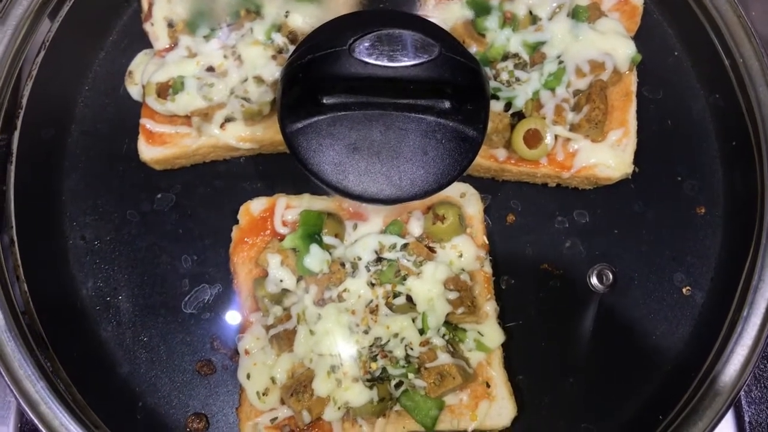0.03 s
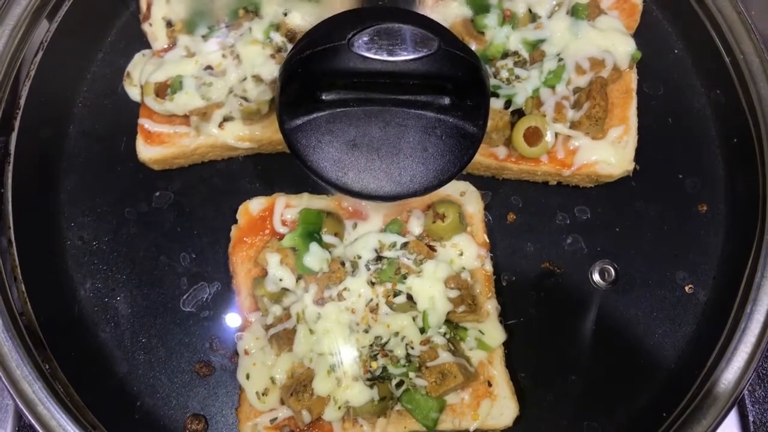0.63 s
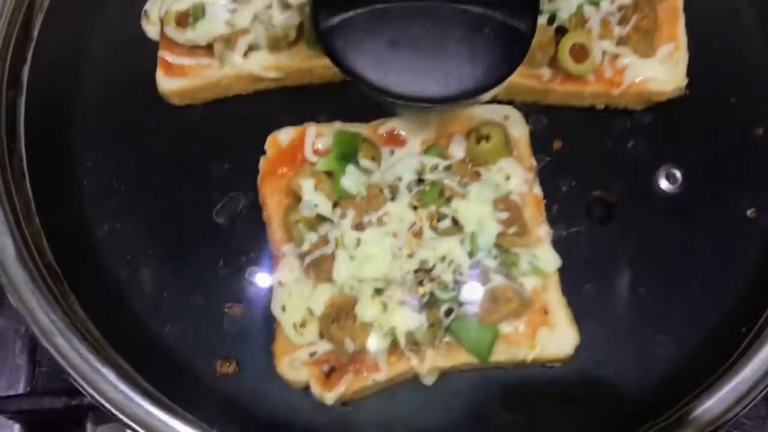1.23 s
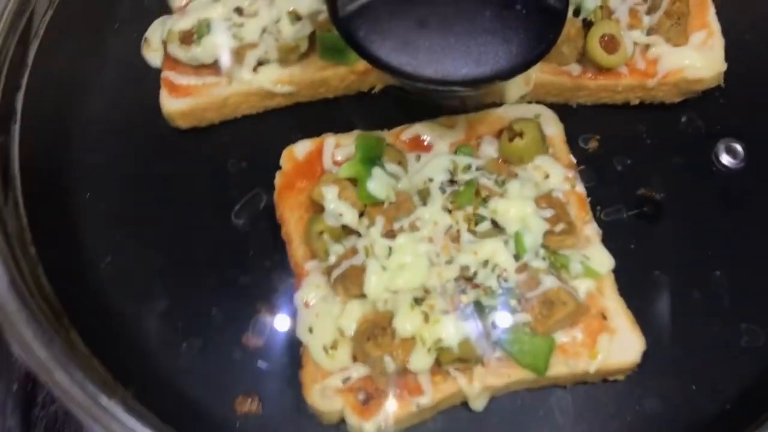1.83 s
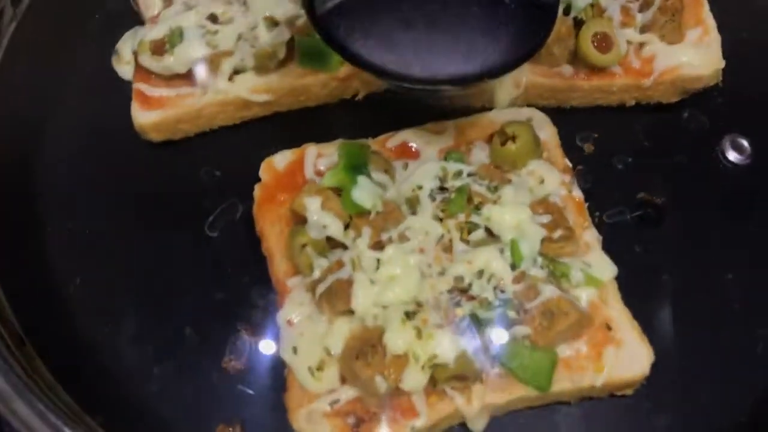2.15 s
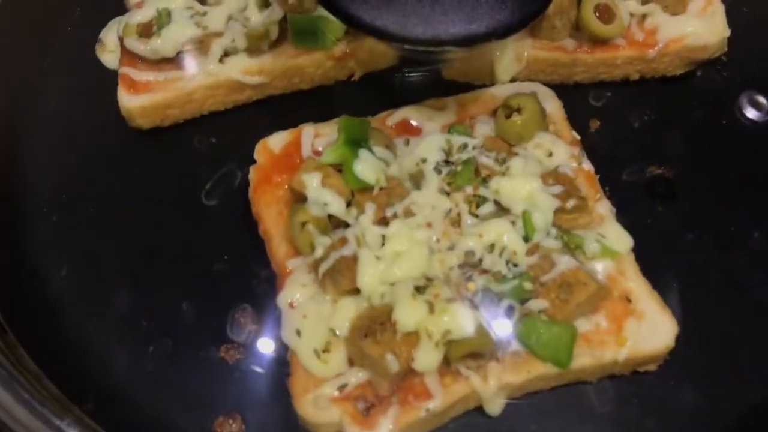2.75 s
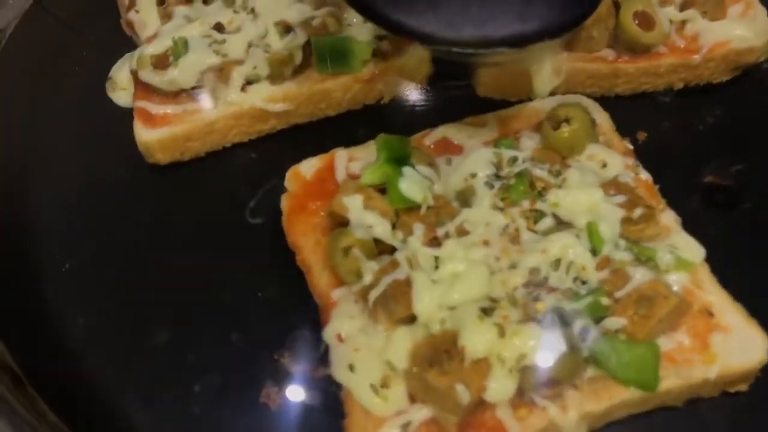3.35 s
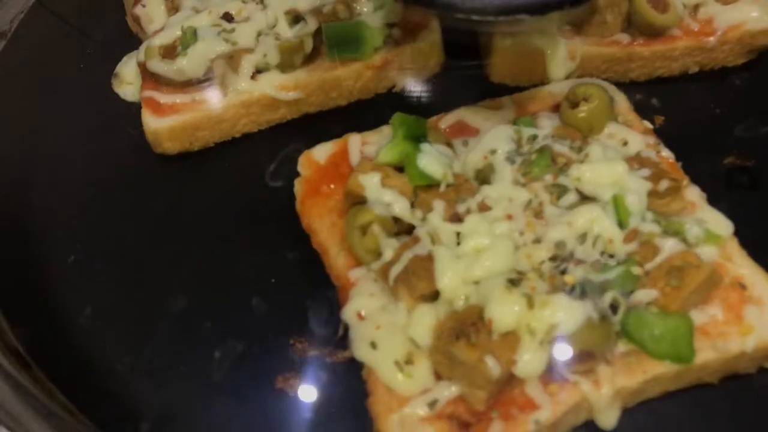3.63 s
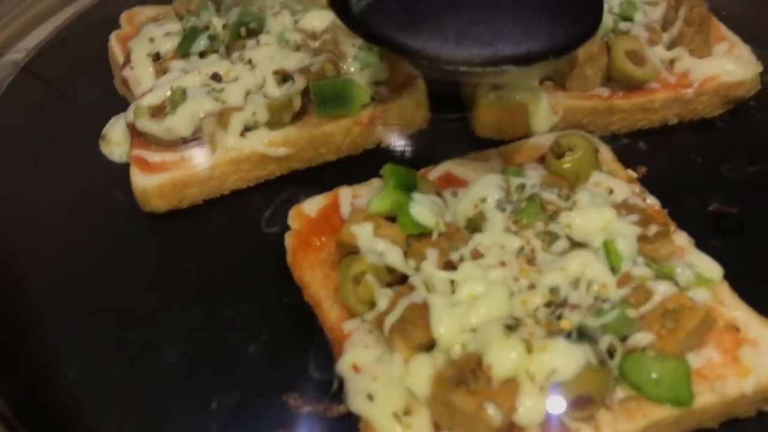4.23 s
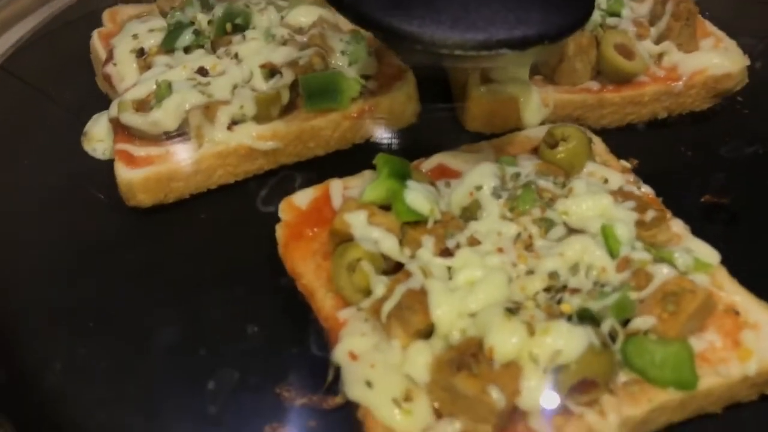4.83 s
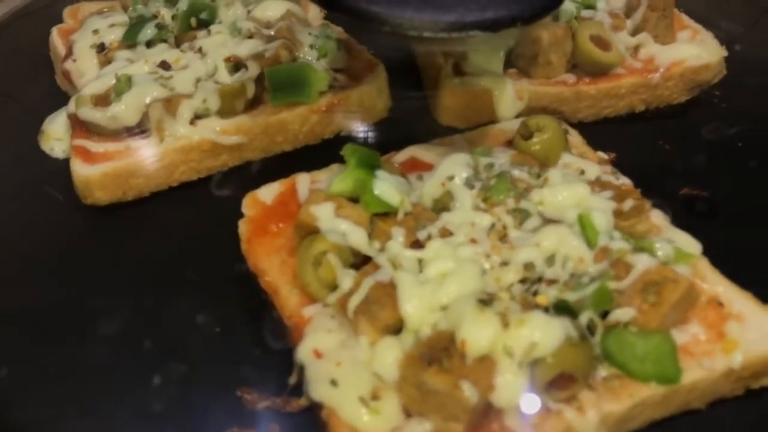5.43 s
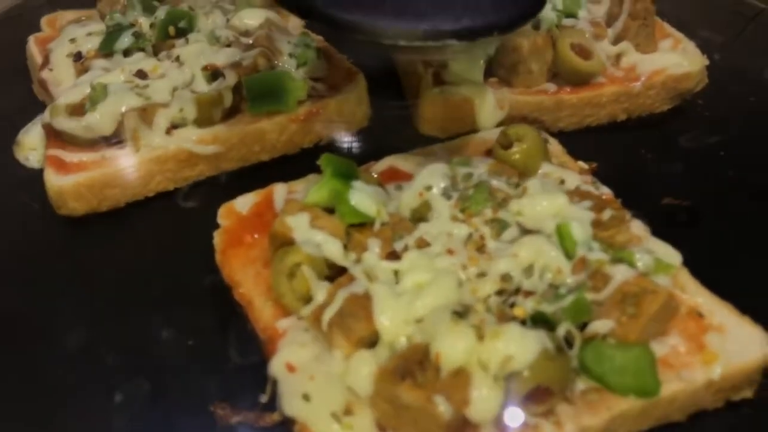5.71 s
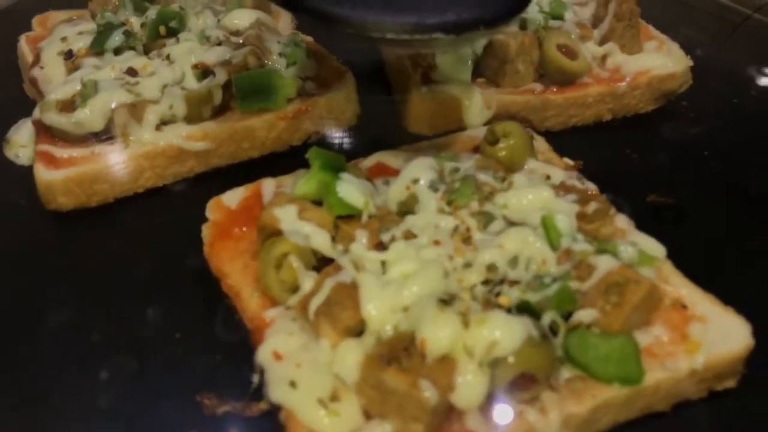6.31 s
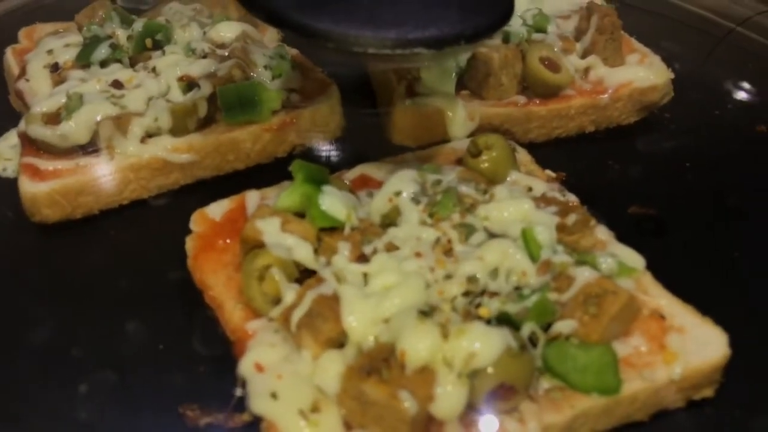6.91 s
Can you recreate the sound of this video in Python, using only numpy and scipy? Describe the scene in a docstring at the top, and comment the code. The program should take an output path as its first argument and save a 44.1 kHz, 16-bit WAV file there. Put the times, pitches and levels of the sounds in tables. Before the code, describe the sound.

Faint sizzling and small pops of fat come from a pan over a low burner murmur, heard up close in a small kitchen. A ringing knock on the pan comes first, then a short drag and a loud clink of its glass lid, which shivers and settles on its metal rim. Light brushes and a tink of a steel utensil follow, with soft low bumps from the hand-held microphone.

```python
"""A small kitchen, where bread toasts in a covered pan. The burner murmurs, and bursting bubbles of fat
sizzle and crackle faintly. Soft bumps ring the low modes of the hand-held microphone as it leans in,
and a steel utensil brushes and tinks. Impact and friction excite the modes of the cookware: the pan is
knocked, then the steel-rimmed glass lid scuffs, drags, clinks loudly, bounces, shivers and rocks to rest."""
import sys
import numpy as np
from scipy import signal
from scipy.fft import rfft, irfft, next_fast_len
from scipy.io import wavfile

SR = 44100
rng = np.random.default_rng(int(sys.argv[2]) if len(sys.argv) > 2 else 0)


def log_audio(samples):
    """Write samples as a 16-bit WAV file to the path given in sys.argv[1]."""
    # one column per channel
    frames = np.atleast_2d(samples).T
    # limit to full scale, then quantise
    limited = np.clip(frames, -1, 1)
    pcm = np.round(limited * 32767).astype(np.int16)
    wavfile.write(sys.argv[1], SR, pcm)


N = 307021

# Contacts of pan and lid. Each row: start in seconds, level in dB, brightness in Hz, contact in seconds.
PAN_BLOWS = [(1.181, -22, 15000, 0.048), (1.1875, -22.5, 6000, 0.014), (1.243, -37, 16000, 0.034),
             (1.289, -53, 9000, 0.016)]
RIM_SCUFFS = [(1.455, -42, 8800, 0.012), (1.466, -47, 5060, 0.073), (2.351, -38.5, 12020, 0.04),
              (2.357, -35, 4920, 0.0084), (2.374, -39.5, 3980, 0.027), (2.403, -43, 1786, 0.027)]
CLINK_AND_BOUNCE = [(2.5378, -13.5, 15600, 0.025), (2.6025, -25.5, 3700, 0.032)]
RIM_ROCKS = [(2.845, -43, 12000, 0.15), (2.905, -45, 12000, 0.15), (2.957, -35, 12000, 0.038),
             (2.992, -30, 3870, 0.012), (3.028, -36.5, 5860, 0.018), (3.063, -54, 2000, 0.0089),
             (3.176, -43.5, 6040, 0.022)]
# Utensil strokes. Each row: time of the peak in seconds, level in dB, swell in seconds, T60 in seconds.
UTENSIL_BRUSHES = [(2.275, -56.5, 0.031, 0.27), (2.358, -46, 0.0077, 0.069), (3.995, -42, 0.0086, 0.18),
                   (4.014, -37, 0.0072, 0.047), (4.235, -49, 0.0038, 0.049), (4.314, -55.5, .006, 0.18)]
UTENSIL_TINKS = [(.492, -52, .003, 0.058), (1.085, -55.5, .004, .1), (1.137, -48.5, .003, 0.091),
                 (4.373, -34.5, 0.0058, 0.11)]
# Impulses. Each row: start in seconds, relative strength in dB.
FIRM_BUMPS = [(0.083, -38.5), (1.556, -41), (1.698, -38), (1.782, -34), (1.8, -36), (2.173, -33),
              (2.732, -36.5), (3.143, -35), (3.468, -34), (3.618, -32), (3.79, -32), (3.857, -32.5),
              (3.94, -38), (4.05, -37), (4.141, -33.5), (4.412, -34), (4.566, -36), (4.66, -33),
              (4.764, -33.5), (4.851, -34), (4.94, -33), (5.035, -33.5), (5.145, -33.5), (5.348, -33),
              (5.561, -33), (6.091, -33), (6.192, -32.5), (6.291, -36), (6.444, -32), (6.656, -31),
              (6.888, -34.5)]
FAT_POPS = [(0.3346, -45.5), (0.7282, -35), (1.6237, -45), (1.6482, -40), (1.8362, -43), (1.8711, -41),
            (2.3825, -45), (3.685, -44), (4.4413, -33), (5.218, -38), (5.5887, -41)]
# Normal modes. Each row: frequency in Hz, relative level in dB, nominal T60 in seconds.
HANDSET_MODES = [(97, -2.5, 0.093), (138, -38, 0.07), (244.5, -23, 0.0055), (279.2, 1.5, 0.057),
                 (362, -18, 0.13), (471, -13.5, 0.06), (615, -13.5, 0.093), (700, -12.5, 0.039),
                 (1010, -18, 0.013)]
PAN_MODES = [(231, -6, 0.6), (926, -5, 0.48), (1093, 0, 0.49), (1115, 0, 0.47), (1340, -8, 0.47),
             (1467, -3, 0.36), (1507, -4, 0.29), (1884, -11, 0.52), (1930, -10, 0.6), (2347, -4, 0.44),
             (2536, -2, 0.46), (2586, -1, 0.41), (3033, -6, 0.45), (3110, -8, 0.55), (3908, -6, 0.6),
             (4167, -6, 0.37), (4667, -20, 0.46), (4877, -10, 0.32), (5285, -12, 0.53), (5475, -13, 0.4),
             (5884, -18, 0.5), (6158, -16, 0.32), (6940, -17, 0.37), (8155, -17, 0.34), (8549, -16, 0.46),
             (8960, -25, 0.42), (9385, -19, 0.31), (10820, -23, 0.36), (12180, -21, 0.27),
             (12410, -19, 0.42)]
FREE_LID_MODES = [(641, -17, 0.58), (942, -11, 0.33), (1010, -9, 0.44), (1043, -11, 0.47),
                  (1104, -13, 0.54), (1165, -10, 0.46), (1378, -13, 0.35), (1600, -13, 0.35),
                  (1730, -15, 0.33), (1884, -17, 0.38), (2165, -10, 0.42), (2272, -18, 0.49),
                  (2375, -15, 0.33), (2620, -14, 0.29), (2853, -18, 0.46), (3080, -17, 0.41),
                  (3560, -10, 0.4), (3765, -17, 0.59), (3978, 0, 0.45), (4011, -2, 0.36), (5100, -24, 0.42),
                  (5335, -16, 0.55), (6100, -12, 0.48), (6950, -13, 0.46), (9055, -20, 0.4),
                  (9469, -31, 0.4), (12015, -27, 0.44), (12200, -30, 0.44)]
SEATED_LID_MODES = [(630, -5.5, 0.22), (1130, -1, 0.15), (1241, -1, 0.2), (2620, -7.5, 0.29),
                    (3580, -15, 0.16), (4150, -17, 0.18), (5240, -23, 0.4), (6130, -34, .4),
                    (6960, -28, .3), (9055, -23, .4)]
# Resonances driven by noise. Each row: frequency in Hz, bandwidth in Hz, relative gain in dB.
BURNER_PEAKS = [(604, 23, -0.64), (620, 100, -1.3)]
CAVITY_PEAKS = [(922.3, 13, 1), (1153, 14.6, 0), (1126, 132, -6), (1478, 53, -10.5)]
SIZZLING_PAN_PEAKS = [(2556, 130, -7.5), (3060, 25, -0.5), (4085, 50, -2.5), (5396, 190, -5), (6017, 50, 1),
                      (6600, 68, -6), (8070, 110, -15)]
BRUSHED_STEEL_PEAKS = [(2207, 18, 3.5), (3733, 35, -3), (4260, 13, -4), (5500, 220, -12.5), (5590, 29, -8),
                       (7360, 14, -6.5), (8640, 78, -13), (9740, 18, -7), (11000, 50, -30.5),
                       (12560, 130, -17.5), (4556, 3000, -22.5)]
TAPPED_STEEL_PEAKS = [(3670, 50, -13.5), (4170, 23, 3.5), (5240, 35, -9), (6670, 13, -9), (6900, 74, -11),
                      (7450, 110, -30), (9300, 57, -19), (12700, 47, -8), (4260, 2800, -23.5)]
# Spectra of steady noise and of dense, brief modes. Each row: frequency in Hz, relative density in dB.
MURMUR_SPECTRUM = [(15, -28), (25, -13), (54, -1), (139, -1.5), (196, -4.5), (216, -7.5), (248, -1),
                   (344, -9.5), (371, -8), (525, -16.5), (612, -7.5), (701, -15.5), (1160, -20),
                   (1270, -26), (2500, -31.5), (3250, -40), (5500, -120)]
SIZZLE_SPECTRUM = [(500, -27), (1500, -1), (2700, 6), (4200, 3), (5000, -0.5), (6000, -3), (6800, -2.5),
                   (7600, -14), (8400, 2), (10000, -7.5), (11400, 2.5), (12600, -3.5), (16000, -3)]
KNOCK_SPECTRUM = [(100, -9), (165, -20), (225, -2.5), (380, -15), (520, -13), (950, -4.5), (1500, -4),
                  (2100, -12.5), (2600, -1.5), (3450, -14.5), (4050, -6), (4700, -17), (8500, -17),
                  (16000, -26.5)]
SCUFF_SPECTRUM = [(120, -46), (200, -23), (292, 13), (447, -25), (550, 3), (1210, -8.5), (1560, -5.5),
                  (2950, -26), (3680, -21), (4680, -26), (12000, -35), (15600, -68), (22000, -120)]
CLINK_SPECTRUM = [(70, -19), (120, -2), (185, -11), (370, -6), (500, -13), (650, -7), (790, -2),
                  (1050, 0.5), (2200, -6), (3300, -7.5), (4200, -3), (4700, -24), (6600, -12.5),
                  (7800, -31.5), (9300, -18), (10500, -49), (12200, -37), (16000, -37)]
ROCK_SPECTRUM = [(180, -55), (300, -16), (535, -16), (562, -12), (639, 0.5), (925, -14), (1200, 6.5),
                 (1450, -9), (2590, -14), (2800, -35), (3630, -18), (4620, -27), (14000, -56)]
# Vigour of the frying, which acts relative to its mean. Each row: time in seconds, level in dB.
FRYING_VIGOUR = [(0.0, -76.5), (1.03, -67.5), (1.43, -68.5), (1.72, -66), (2.48, -71), (2.73, -66),
                 (3.18, -71.5), (3.95, -62), (5.08, -67.5), (5.45, -64), (6.43, -66.5), (6.96, -58)]

KITCHEN_T60_S, CUTOFF_HZ = 0.54, 15800
ROLL_ON_S = 0.003   # build-up of a rolling or sliding contact
TIME = np.arange(N) / SR


def from_db(db):
    """Amplitude grows tenfold for every 20 dB."""
    return 10 ** (np.asarray(db) / 20)


def unit_rms(x):
    """Division by the rms gives a signal unit power."""
    return x / np.sqrt(np.mean(x ** 2) + 1e-20)


def decay(t, t60):
    """Damping lowers a vibration exponentially, by 60 dB in t60 seconds."""
    return np.exp(-np.log(1000) * t / t60)


def ramp(start_s, length_s):
    """A linear transition rises from 0 to 1 and holds."""
    return np.clip((TIME - start_s) / length_s, 0, 1)


def butter(x, hz, kind, order=2):
    """A Butterworth filter falls 6 dB an octave per order beyond its corner."""
    return signal.sosfilt(signal.butter(order, hz, kind, fs=SR, output="sos"), x + 1e-18)


def add(out, start_s, sound):
    """By superposition, a sound adds to those already present."""
    start = round(start_s * SR)
    out[start:start + len(sound)] += sound[:len(out) - start]


def impulses(rows):
    """A very brief force acts as a single impulse."""
    out = np.zeros(N)
    for start_s, db in rows:
        add(out, start_s, from_db([db]))
    return out


def coloured(spectrum, size):
    """Filtered white noise takes on the spectrum of the filter; the rms is 1."""
    hz, db = np.transpose(spectrum)
    padded = next_fast_len(size)
    f = np.fft.rfftfreq(padded, 1 / SR) + 1e-3
    skirts = 1 / ((1 + (hz[0] / f) ** 4) * (1 + (f / hz[-1] / 2) ** 4))
    gain = from_db(np.interp(np.log(f), np.log(hz), db)) * skirts
    return unit_rms(irfft(rfft(rng.standard_normal(padded)) * gain, padded)[:size])


def rippled(spectrum, depth_db=5, spacing_hz=55):
    """Many weak resonances lay narrow peaks and valleys over a smooth spectrum."""
    hz, db = np.transpose(spectrum)
    grid = np.arange(spacing_hz, CUTOFF_HZ, spacing_hz)
    ripple = depth_db * np.clip(rng.standard_normal(len(grid)), -2, 2) * grid / (grid + 1000)
    return np.column_stack([grid, np.interp(np.log(grid), np.log(hz), db) + ripple])


def resonant(peaks, size):
    """Randomly forced resonators respond most near their natural frequencies; the rms is 1."""
    out = 0
    for hz, width, db in peaks:
        radius = np.exp(-np.pi * width / SR)
        poles = [1, -2 * radius * np.cos(2 * np.pi * hz / SR), radius ** 2]
        out += from_db(db) * signal.lfilter([1 - radius, 0, radius - 1], poles, rng.standard_normal(size))
    return unit_rms(out)


def interference(size, rate_hz):
    """Reflections adding in and out of step give a wandering complex amplitude."""
    knots, samples = np.arange(0, size, SR / rate_hz), np.arange(size)
    real, imag = rng.standard_normal((2, 400))[:, :len(knots)]
    return np.interp(samples, knots, real + 1j * imag) / np.sqrt(2)


def blows(rows, modes, spectrum, *, ring_db, tilt_db, sustain_db, t60_scale, clatter_db, room_db,
          dull_hz, attack_s):
    """Struck bodies vibrate freely until contact damps them; a weaker ring and reverberation remain."""
    out, t = np.zeros(N), np.arange(SR) / SR
    modal_rms = np.sqrt(np.sum(from_db(np.array(modes)[:, 1]) ** 2) / 2)
    body = rippled(spectrum)
    for start_s, db, bright_hz, contact_s in rows:
        free = np.exp(-(t / contact_s) ** 4) * decay(t, 0.24)
        ring = 0
        for hz, mode_db, t60 in modes:
            sustain = from_db(sustain_db) * decay(t, t60 * t60_scale)
            envelope = free + sustain * (0.5 + interference(SR, rate_hz=61.3))
            strength = from_db(mode_db + tilt_db * np.log2(1 + hz / 3000))   # hard contacts tilt upward
            ring += strength * np.real(envelope * np.exp(2j * np.pi * (hz * t + rng.random())))
        # Dense, brief modes merge into a clatter, whose treble dies first in the room.
        echo = coloured(body, SR)
        low = butter(echo, dull_hz, "low", order=1)
        tail = low * decay(t, KITCHEN_T60_S) + (echo - low) * decay(t, KITCHEN_T60_S * 0.63)
        clatter = coloured(body, SR) * free + from_db(room_db) * tail
        sound = from_db(ring_db) * ring / modal_rms + from_db(clatter_db) * clatter
        onset = 1 - np.exp(-t / attack_s)
        add(out, start_s, from_db(db) * butter(sound * onset, bright_hz, "low"))
    return out


def stove():
    """The burner murmurs; near the pan, cavity resonance under the lid takes over from its tone."""
    nearness = ramp(1.3, 2.43) - 0.33 * ramp(5.0, 0.86)   # the microphone leans in, then partly back
    murmur = from_db(-53.5 + nearness) * coloured(MURMUR_SPECTRUM, N)
    cavity = from_db(-66.5 + 10 * nearness) * resonant(CAVITY_PEAKS, N)
    tone = from_db(-60.5 - 7.5 * nearness) * resonant(BURNER_PEAKS, N)
    return murmur + cavity + tone


def sizzle(vigour_db):
    """The hiss of hot fat forces the pan's resonances, whose ring swells once, slowly."""
    hiss = from_db(-62.5 + 0.31 * vigour_db) * coloured(rippled(SIZZLE_SPECTRUM, depth_db=3), N)
    swell_db = 5 * np.exp(-((TIME - 2.92) / 1.6) ** 2)
    return hiss + from_db(-67.5 + swell_db) * resonant(SIZZLING_PAN_PEAKS, N)


def bursting_fat(vigour_db, crackles_per_s=500, spread_db=5.5, drying_db_per_s=1.46, spits_per_s=11):
    """Bursting bubbles make shot noise: a fine crackle, sharp pops and lower spits from larger bubbles."""
    sizes = from_db(spread_db * np.minimum(rng.exponential(1, N), 4)) * rng.choice([-1, 1], N)
    tiny_bursts = sizes * (rng.random(N) < crackles_per_s / SR)
    t = np.arange(SR // 10) / SR
    snap = rng.standard_normal(len(t)) * (decay(t, 0.0058) + from_db(-12) * decay(t, 0.13))
    crackle = butter(signal.fftconvolve(tiny_bursts, snap)[:N], 9300, "high")
    crackle_db = -60.5 + 1.2 * vigour_db - drying_db_per_s * TIME   # drying bread crackles less
    pops = butter(signal.fftconvolve(impulses(FAT_POPS), snap)[:N], 6700, "high", order=1)
    large_bursts = rng.uniform(-1, 1, N) * (rng.random(N) < spits_per_s / SR)
    spits = signal.fftconvolve(large_bursts, snap)[:N]
    spits = butter(butter(spits, 2600, "high"), 4800, "low")
    return from_db(crackle_db) * unit_rms(crackle) + from_db(-71) * unit_rms(spits) + from_db(-1) * pops


def fidgets(per_s=5, settle_s=3.5):
    """Faint bumps arrive as a Poisson process whose rate falls as the hand settles."""
    happens = rng.random(N) < per_s * np.exp(-TIME / settle_s) / SR
    levels_db = rng.normal(-43, 4.5, N)
    return impulses(zip(TIME[happens], levels_db[happens]))


def handling_bumps():
    """Structure-borne impulses ring the low modes of the handset, with a trace of a tick."""
    pushes = impulses(FIRM_BUMPS) + fidgets()
    grip = from_db(3.5 - 20 * ramp(5.3, 0.4))   # eases once and stays loose
    thud = 0
    for k, (hz, db, t60) in enumerate(HANDSET_MODES):
        radius, angle = decay(1 / SR, t60), 2 * np.pi * hz / SR
        poles = [1, -2 * radius * np.cos(angle), radius ** 2]
        drive = pushes * grip if k < 2 else -pushes   # the grip feeds two modes; the rest oppose them
        thud += from_db(db) * signal.lfilter([0, np.sin(angle)], poles, drive + 1e-18)
    tick = butter(pushes, 1400, "low", order=4)
    return from_db(-3) * butter(thud, 64, "high") + from_db(7.5) * tick


def utensil(rows, peaks, lead_s=0.25):
    """Friction swells and briefly drives the resonances of thin steel."""
    out, t = np.zeros(N), np.arange(SR) / SR - lead_s
    for peak_s, db, swell_s, t60 in rows:
        stroke = np.exp(np.minimum(t, 0) / swell_s) * decay(np.maximum(t, 0), t60)
        add(out, peak_s - lead_s, from_db(db) * stroke * resonant(peaks, SR))
    return out


def pan_knock():
    """An abrupt impact excites all the modes of the pan at once."""
    return blows(PAN_BLOWS, PAN_MODES, KNOCK_SPECTRUM, ring_db=-2, tilt_db=2, sustain_db=-12.5,
                 t60_scale=1, clatter_db=1, room_db=-10.5, dull_hz=3500, attack_s=0.00043)


def rim_scuffs():
    """Sliding contact of the rim on the pan yields more broadband clatter than ring."""
    return blows(RIM_SCUFFS, PAN_MODES, SCUFF_SPECTRUM, ring_db=-8, tilt_db=2.3, sustain_db=-10,
                 t60_scale=0.69, clatter_db=4.5, room_db=-11, dull_hz=2500, attack_s=ROLL_ON_S)


def rim_drag(release_s=2.355, swell_s=0.16):
    """Friction noise grows as the rim presses harder on the pan, until it breaks into a scuff."""
    t = TIME - release_s
    envelope = np.exp(np.minimum(t, 0) / swell_s) * decay(np.maximum(t, 0), KITCHEN_T60_S)
    rub = from_db(-48) * coloured(rippled(SCUFF_SPECTRUM), N)
    rumble = from_db(-47.5) * unit_rms(butter(coloured(MURMUR_SPECTRUM, N), 160, "low"))
    return envelope * (rub + rumble)


def lid_clink():
    """A hard impact favours the lid's high modes; the bounce is weaker and duller."""
    return blows(CLINK_AND_BOUNCE, FREE_LID_MODES, CLINK_SPECTRUM, ring_db=-1.5, tilt_db=3.5,
                 sustain_db=-9, t60_scale=0.99, clatter_db=0.5, room_db=-9.5, dull_hz=1992,
                 attack_s=0.00017)


def lid_shiver(start_s=2.712, gap_s=0.04, loss_db=2, bright_hz=16000, contact_s=0.051):
    """The lid chatters on the pan in light, evenly spaced touches, losing energy at each."""
    touches = [(start_s + k * gap_s, -46.5 - k * loss_db, bright_hz, contact_s) for k in range(5)]
    return blows(touches, FREE_LID_MODES, CLINK_SPECTRUM, ring_db=-2, tilt_db=4.5, sustain_db=-9,
                 t60_scale=1, clatter_db=3.5, room_db=-8, dull_hz=2200, attack_s=ROLL_ON_S)


def lid_rocking():
    """Rolling contact on the rim excites the more heavily damped modes of the seated lid."""
    return blows(RIM_ROCKS, SEATED_LID_MODES, ROCK_SPECTRUM, ring_db=-1.5, tilt_db=-0.5, sustain_db=-3.5,
                 t60_scale=0.79, clatter_db=3, room_db=-13, dull_hz=3000, attack_s=ROLL_ON_S)


def scene():
    """The pressures of all sources superpose at one close microphone."""
    steel = utensil(UTENSIL_BRUSHES, BRUSHED_STEEL_PEAKS) + utensil(UTENSIL_TINKS, TAPPED_STEEL_PEAKS)
    vigour_db = np.interp(TIME, *np.transpose(FRYING_VIGOUR))
    vigour_db -= vigour_db.mean()
    frying = sizzle(vigour_db) + bursting_fat(vigour_db)
    cookware = pan_knock() + lid_clink() + lid_shiver() + lid_rocking() + rim_scuffs() + rim_drag()
    return (cookware + steel + handling_bumps() + frying + stove())[None]


def record(dry):
    """Soft saturation rounds the peaks, and a steep low-pass limits the bandwidth."""
    low_pass = signal.ellip(10, 0.1, 80, CUTOFF_HZ, fs=SR, output="sos")
    return signal.sosfilt(low_pass, 1.2 * np.tanh(dry / 1.2))


dry = scene()
out = record(dry)
log_audio(out)
```